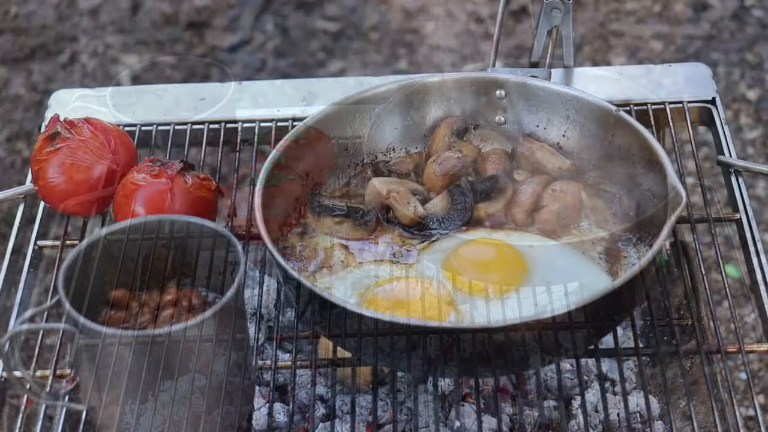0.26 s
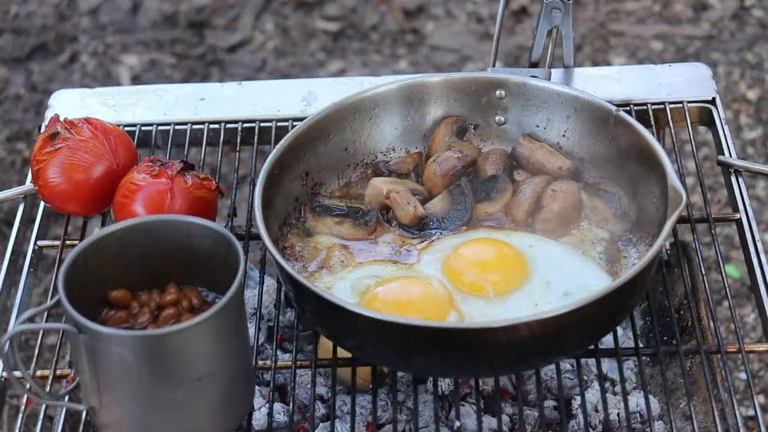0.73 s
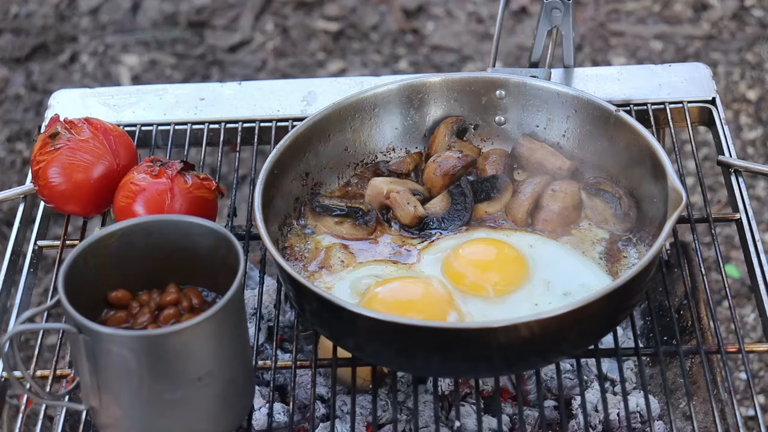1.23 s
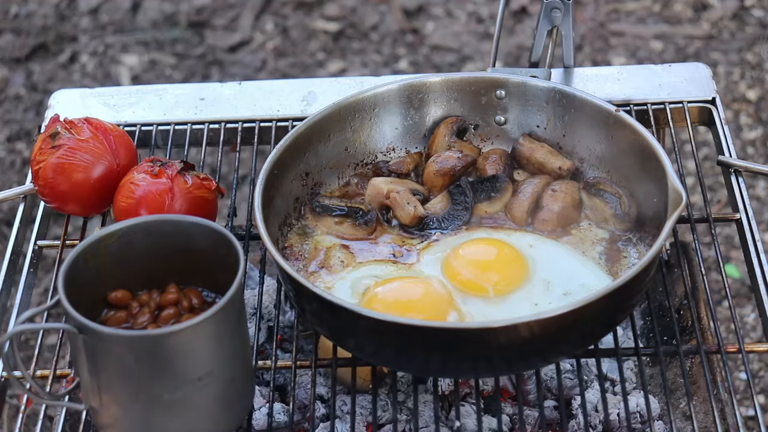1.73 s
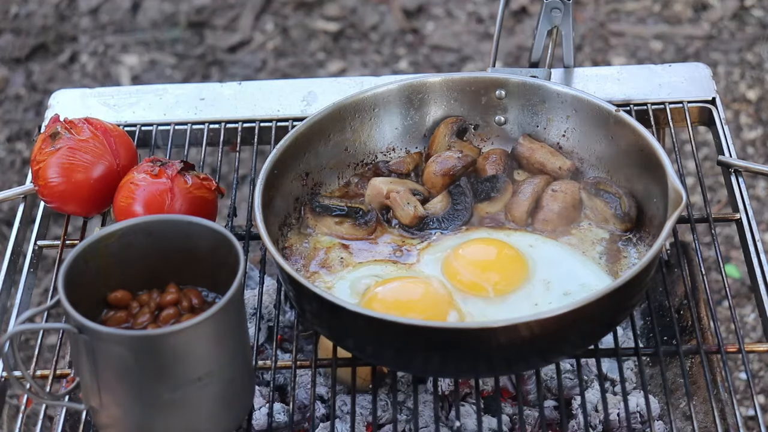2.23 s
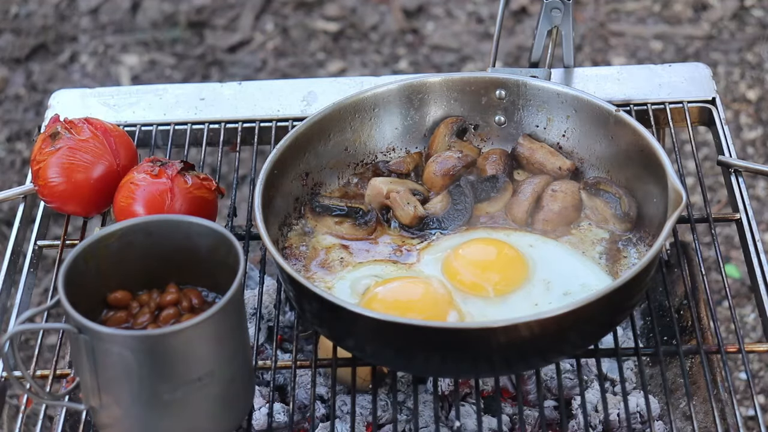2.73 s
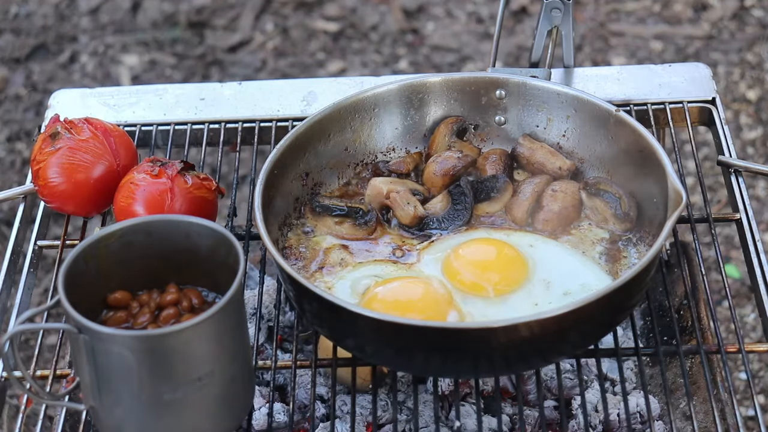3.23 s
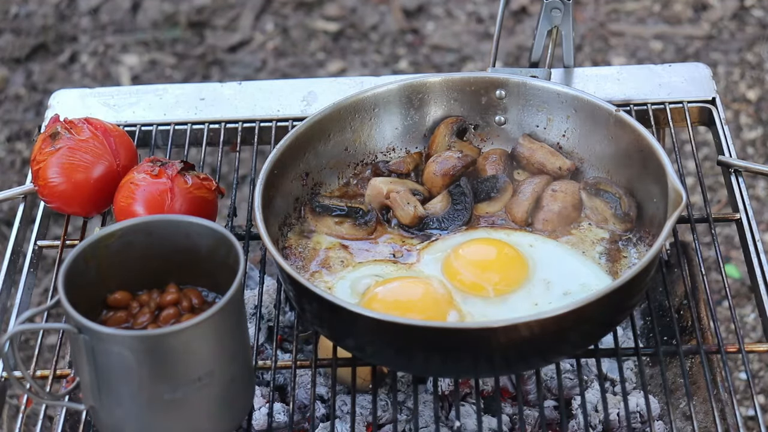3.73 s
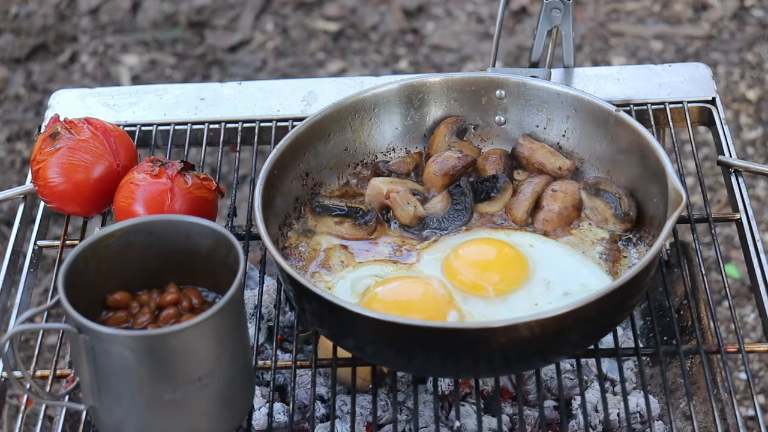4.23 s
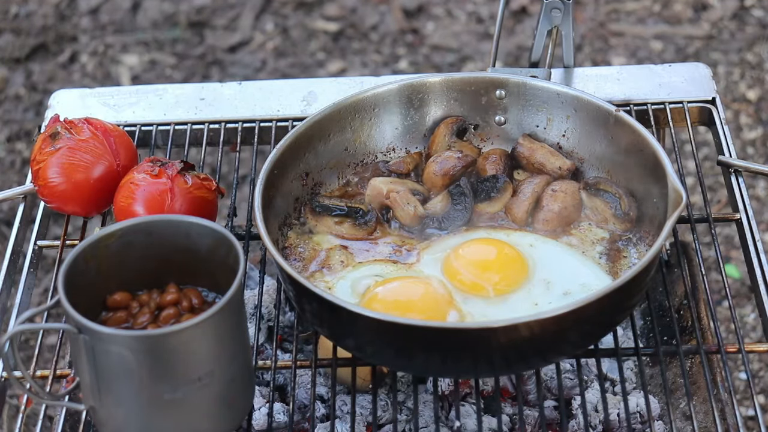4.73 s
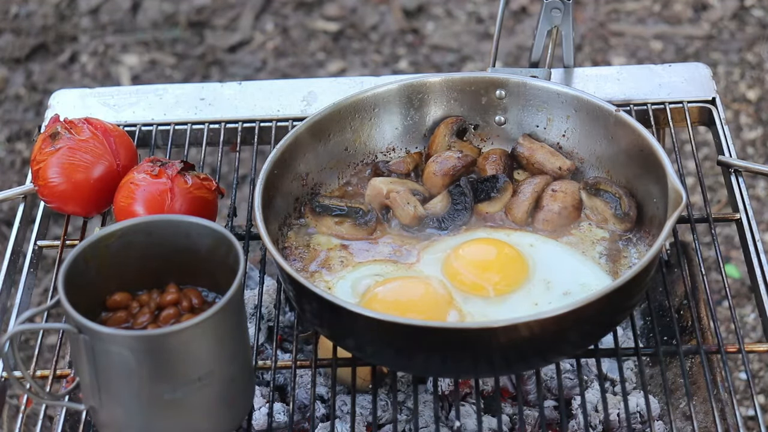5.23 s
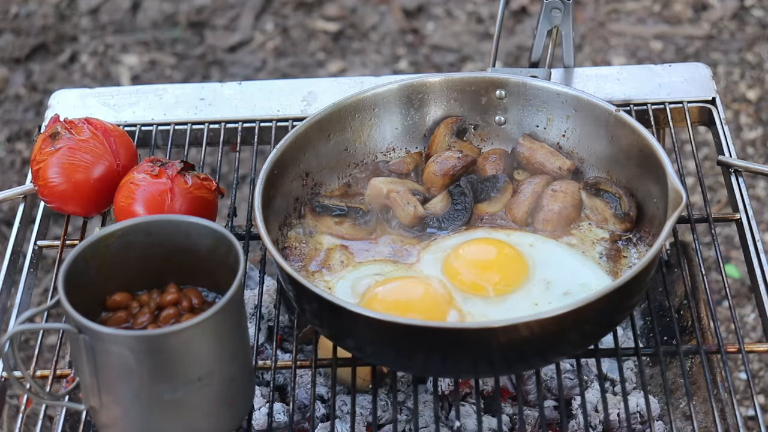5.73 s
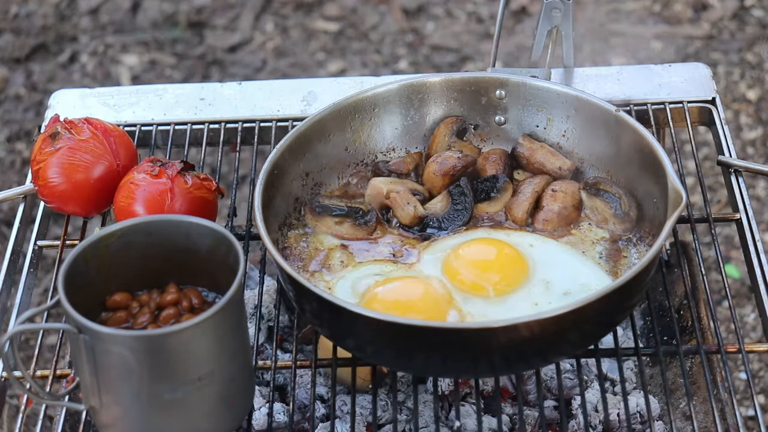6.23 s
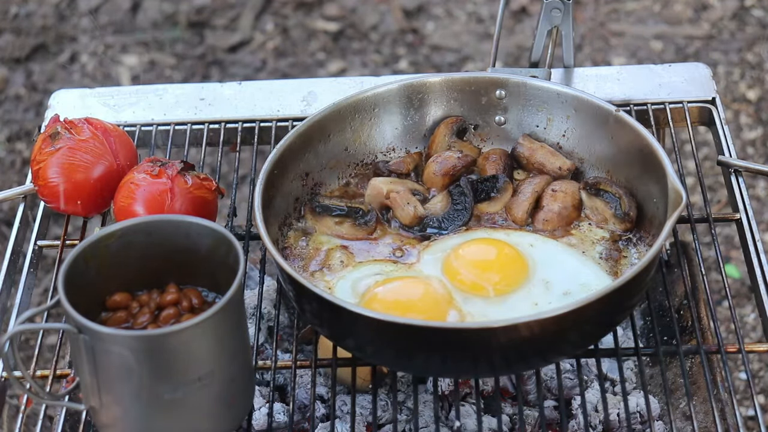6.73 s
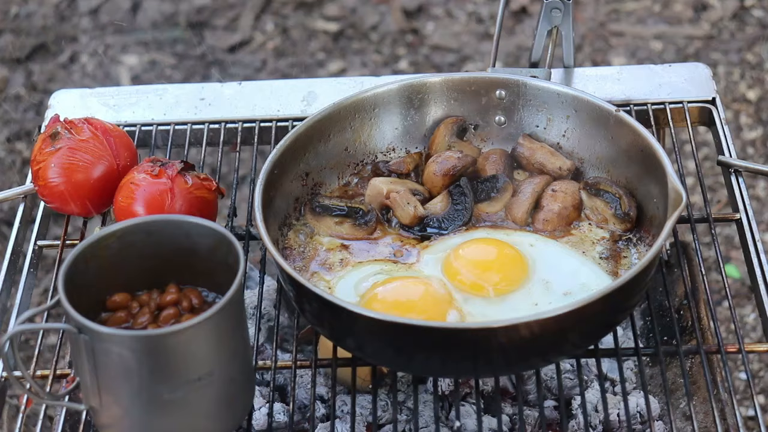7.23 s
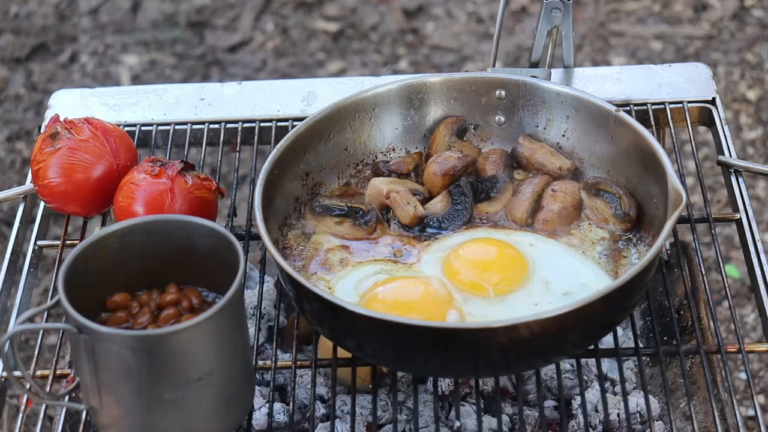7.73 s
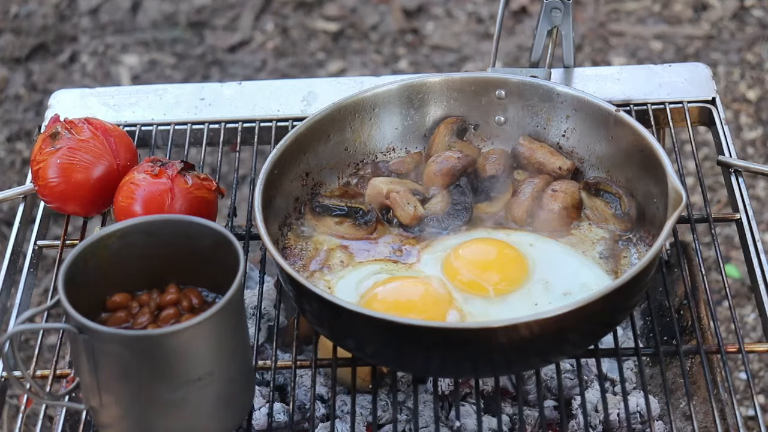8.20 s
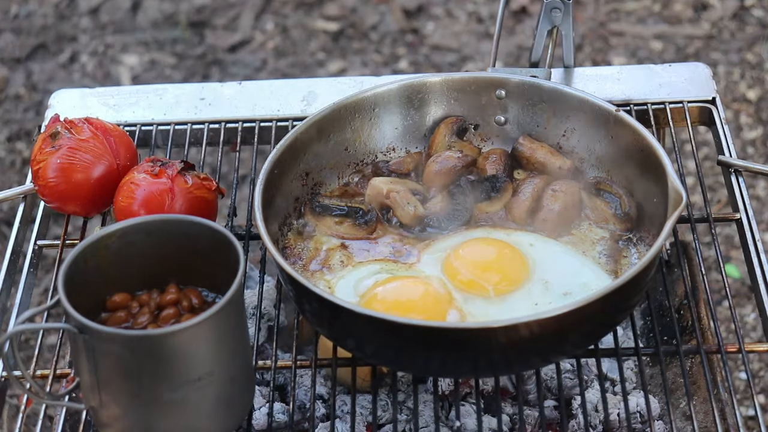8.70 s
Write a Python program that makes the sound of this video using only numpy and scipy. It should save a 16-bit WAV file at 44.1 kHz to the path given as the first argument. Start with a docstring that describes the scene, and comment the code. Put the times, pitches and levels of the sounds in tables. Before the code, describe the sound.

Very close, dry outdoor sound of food frying in a steel pan. A steady fine fizz with dense tiny crackles runs throughout. Sparse sharp pops ring briefly in the pan; a short flare of sizzling comes early, one very loud pop midway, then pops grow frequent and end in a cluster of hard spits. Faint dull thumps and low rumble lie beneath.

```python
"""Outdoors, over charcoal, eggs and mushrooms fry in a steel pan, heard close up.
Water boiling under the fat fizzes (noise grains in flickering bands) and crackles (random clicks through resonances).
Bigger pockets burst as sharp pops: decaying sines that ring the bowl of the pan, with splashes and two short echoes.
Steam squirts as buzzing puffs through a resonance. Dull thumps are a swing or two of a low tone, jolts ring
the microphone mount, and wind is a faint low band of noise."""
import sys
import numpy as np
from scipy import signal
from scipy.io import wavfile

SR = 44100
rng = np.random.default_rng(int(sys.argv[2]) if len(sys.argv) > 2 else 0)


def waveform_to_disk(signal):
    """Save audio, clipped to [-1, 1], as 16-bit WAV at the path in sys.argv[1]."""
    frames = np.transpose(np.atleast_2d(signal))
    scaled = np.clip(frames, -1, 1) * 32767
    samples = np.round(scaled).astype(np.int16)
    wavfile.write(sys.argv[1], SR, samples)


N = 395136


def from_db(db):
    """Decibels to gain."""
    return 10 ** (np.asarray(db) / 20)


def rms_one(x):
    """Scale to unit rms."""
    return x / np.sqrt(np.mean(x ** 2) + 1e-20)


def in_time(rows):
    """Each column after the first as a curve over all samples; the first holds the seconds."""
    seconds, *columns = np.transpose(rows)
    return [np.interp(np.arange(N) / SR, seconds, column) for column in columns]


def drift(rate):
    """Slow random wander with about this many turns a second and unit spread, made at every 40th sample."""
    r = np.exp(-80 * np.pi * rate / SR)
    noise = rng.standard_normal(N // 40 + 2002)
    slow = signal.lfilter([1], [1, -2 * r, r * r], noise)[2000:]   # skip the filter's start
    return np.interp(np.arange(N) / 40, np.arange(len(slow)), rms_one(slow))


def band(x, low_hz, high_hz):
    """Band-pass."""
    sos = signal.butter(2, [low_hz, min(high_hz, 19000)], "band", fs=SR, output="sos")
    return signal.sosfilt(sos, x)


def spikes(times, gains):
    """A click of each gain at each time in seconds."""
    return np.bincount(np.round(np.asarray(times) * SR).astype(int), gains, N)[:N]


def grains(per_s, spread_db, most):
    """Clicks at random moments; few are large."""
    happens = rng.random(N) < per_s / SR
    return happens * from_db(spread_db * np.minimum(rng.exponential(1, N), most))


def ring(clicks, hz, width_hz):
    """A unit click sets a sine of height 1 ringing; the wider the resonance, the sooner it dies."""
    r, w = np.exp(-np.pi * width_hz / SR), 2 * np.pi * hz / SR
    return signal.lfilter([0, np.sin(w)], [1, -2 * r * np.cos(w), r * r], clicks + 1e-18)


def splash(clicks, low_hz, high_hz, t60):
    """Droplets rain back after a burst: band-passed noise whose envelope falls 60 dB in t60 seconds."""
    envelope = signal.lfilter([1], [1, -from_db(-60 / (t60 * SR))], clicks)
    return band(envelope * rng.standard_normal(N), low_hz, high_hz)


def thud(clicks, hz):
    """One or two dull swings of a heavily damped resonance."""
    return band(ring(clicks, hz, .5 * hz), 0.23 * hz, 3.4 * hz)


def bubble(hz, cycles):
    """A collapsing pocket swells for about a cycle, then rings at its pitch, falling 60 dB in these cycles."""
    turns = np.arange(300) / SR * hz
    return -np.sin(2 * np.pi * turns) * from_db(-60 * turns / cycles) * np.tanh(turns / 1.2)


# Spectrum of the fizz. Each row: frequency in Hz, relative density in dB per Hz.
FIZZ_SPECTRUM = [(53, -16), (90, -5), (286, -6.5), (600, -5.5), (908, 3.5), (1260, -1.5), (2530, -4),
                 (3360, -3), (4870, -10.5), (6050, -18), (15100, -21.5)]


def fizz(level_db, patchy_db):
    """Thousands of tiny bubbles a second, in third-octave bands that flicker partly together."""
    hz, db = np.transpose(FIZZ_SPECTRUM)
    edges = 70 * 2 ** np.arange(0, 8.1, 1 / 3)
    together, out = drift(20), 0
    swarms = [grains(8000, spread_db=3.0, most=4) * rng.standard_normal(N) for _ in range(2)]
    for k, (low, high) in enumerate(zip(edges, edges[1:])):
        gain_db = np.interp(np.log(low * high) / 2, np.log(hz), db)
        flicker_db = patchy_db * (0.6 * together + drift(9))
        out = out + from_db(gain_db + flicker_db) * band(swarms[k % 2], low, high)   # swarms alternate
    return from_db(level_db) * out / np.std(band(out, 600, 5500))   # level set on the middle range


# Large bursting pockets. Each row: start in seconds, then levels in dB before the mix gains of the low ring,
# mid ring and bright crack, own pitch in Hz.
POP_BURSTS = [(0.398, -21.5, -15.5, -52, 2850), (0.4247, -14, -13.5, -22, 3630),
              (1.0343, -15.5, -26.5, -26.5, 3600), (1.2664, -10, -14, -22, 2920),
              (1.426, -15, -20, -46, 2860), (1.4896, -20, -24, -48, 2280), (2.0195, -17, -19.5, -27, 2870),
              (2.44, -17, -16.5, -49, 2520), (3.4469, -21.5, -18.5, -31.5, 3400),
              (3.7321, -22, -23, -30, 3150), (3.8086, -19.5, -19.5, -29.5, 3460),
              (4.4806, -9.5, -10.5, -31, 3400), (4.5608, -.5, 3, -10, 2670),
              (4.7427, -19, -18.5, -37, 3100), (4.9322, -22, -25.5, -32.5, 2230),
              (5.4591, -7, -10.5, -18, 3520), (5.8238, -18.5, -27, -34, 3270),
              (5.8922, -16.5, -24, -35, 2150), (5.9306, -13.5, -20, -33, 2650),
              (6.027, -17.5, -21.5, -31, 2900), (6.6051, -6.5, -9, -21.5, 3640),
              (6.701, -15.5, -19, -30, 2260), (6.862, -18.5, -14.5, -47, 3240),
              (6.9842, -15.5, -15, -34, 2600), (7.0254, -5.5, -11.5, -20, 2360),
              (7.1679, -13, -18, -28, 3660), (7.297, -11, -9.5, -21.5, 3500),
              (7.4565, -11, -14.5, -24.5, 3540), (7.674, -11, -22.5, -25, 2300),
              (7.7683, -15, -26, -31, 2410), (7.7801, -4, -13, -22, 3380), (7.858, -6, -10, -26, 3500),
              (8.044, -14, -28, -49, 2570), (8.2076, -5, -14, -21, 3650), (8.3207, -14, -15.5, -32, 3480),
              (8.454, -17, -24, -27, 2530), (8.4675, -5, -4.5, -14.5, 4070), (8.501, 1, -2.5, -19, 3270),
              (8.551, -15, -13.5, -17, 2940), (8.5645, -9, -11.5, -24, 3870), (8.6266, 0.5, 3, -5, 3650),
              (8.6877, -9.5, -18.5, -25, 3860), (8.8307, -8.5, -20, -37, 2960)]


def pops():
    """Large pockets ring at their own pitch, excite the bowl, splash and push the pan bottom."""
    s, low_db, mid_db, bright_db, own_hz = np.transpose(POP_BURSTS)
    low, mid, bright = (spikes(s, from_db(db)) for db in (low_db, mid_db, bright_db))
    own = np.zeros(N)
    for at, db, hz in zip(np.round(s * SR).astype(int), mid_db, own_hz):
        own[at:at + 300] += from_db(db) * bubble(hz, cycles=15.0)
    wet = from_db(-28) * splash(low, 330, 1500, t60=0.01)
    wet += from_db(-2.0) * splash(mid, 1890, 4270, t60=0.017)
    wet += from_db(-17.5) * splash(bright, 6600, 13400, t60=0.06)
    # the pan bottom gives a low push, only so far
    push = from_db(-25.5) * thud(np.minimum(low, from_db(-8.5)), 190)
    pan = bowl(low, from_db(-2.0) * mid, from_db(1.5) * bright, scatter_db=-2.5)
    return own + wet + push + pan


# Resonances of the air in the bowl of the pan, two low and three mid.
# Each row: frequency in Hz, width in Hz, relative level in dB.
BOWL_MODES = [(727, 470, -3.5), (1188, 179, -7.5), (2220, 314, -10), (3487, 660, -3), (4810, 230, -12.5)]


def bowl(low, mid, bright, scatter_db):
    """Bursts pull the air in the bowl inward, each mode with a strength of its own; above them a dry crack."""
    def uneven(clicks, db):
        """Give every click a random strength."""
        return clicks * from_db(db + scatter_db * np.clip(rng.standard_normal(N), -2, 1))

    low_ring = sum(ring(uneven(low, db), hz, width_hz) for hz, width_hz, db in BOWL_MODES[:2])
    mid_ring = sum(ring(uneven(mid, db), hz, width_hz) for hz, width_hz, db in BOWL_MODES[2:])
    crack = splash(uneven(bright, -0.67), 6000, 9360, t60=0.0044)
    crack += splash(uneven(bright, 0), 9400, 14600, t60=0.0077)
    # an open pan radiates little bass; minus is the inward pull
    return crack - band(low_ring, 567, 3000) - band(mid_ring, 1460, 4800)


def crackle(per_s, level_db):
    """Small bursts at random; each favours a few resonances, so most are narrow ticks."""
    wavering_per_s = per_s * from_db(3.0 * drift(6))
    size = from_db(level_db) * grains(wavering_per_s, spread_db=5.0, most=3.3)
    tilt_db = 6.0 * np.clip(rng.standard_normal(N), -1.6, 1.6)   # dark to bright, per click
    return bowl(size * from_db(-tilt_db - 7), size, size * from_db(tilt_db - 19), scatter_db=5.5)


# Small dry ticks, each near one pitch. Each row: start in seconds, level in dB before the mix gains, pitch in Hz.
TICK_POCKETS = [(0.0566, -33.5, 920), (0.1712, -33, 1170), (0.1858, -29, 3560), (.458, -25, 3500),
                (0.482, -23.5, 3530), (0.8845, -27.5, 3960), (1.5351, -26, 2500), (1.539, -25, 3250),
                (1.5945, -31, 2980), (1.6245, -27.5, 3200), (1.634, -26.5, 4000), (1.7695, -29.5, 4300),
                (2.1715, -31, 4800), (2.195, -26.5, 4700), (2.235, -28.5, 13350), (2.4863, -27, 4340),
                (2.6497, -25, 3670), (2.796, -26, 10600), (2.8322, -23, 3920), (2.88, -27, 790),
                (3.1168, -21, 3560), (3.278, -24, 3520), (3.3338, -28, 3290), (3.3947, -24, 3230),
                (3.4516, -21, 2720), (3.579, -28, 3570), (3.8862, -26.5, 3620), (3.8967, -29, 4950),
                (4.1439, -21, 2880), (4.2311, -21, 3460), (4.4082, -29.5, 2280), (4.448, -23, 3570),
                (4.4968, -26, 12270), (4.8007, -23, 2500), (4.8542, -27, 7750), (5.8343, -28.5, 1190),
                (5.87, -29, 3500), (5.9915, -29, 3650), (6.0511, -24.5, 5000), (6.1554, -26, 12880),
                (6.3515, -25, 3540), (6.633, -22.5, 13220), (6.7652, -28.5, 3530), (6.8011, -25, 3960),
                (6.8807, -26, 4600), (6.925, -27, 1300), (7.2254, -21, 2980), (7.5893, -22.5, 3860),
                (7.7344, -26, 1190), (7.742, -22, 3900), (7.7523, -24.5, 8000), (7.8113, -26, 3960),
                (7.8443, -23.5, 7700), (7.8532, -19, 4020), (7.8858, -25.5, 1190), (7.9966, -27, 1210),
                (8.156, -35, 1260), (8.2538, -20.5, 11200), (8.3385, -23.5, 12580), (8.4345, -28, 3600),
                (8.5257, -17.5, 3620), (8.6208, -19, 3770)]


def ticks():
    """A few cycles at the pitch of each tiny pocket, a broad dry snap, and an uneven ring of the bowl."""
    s, db, hz = np.transpose(TICK_POCKETS)
    clicks = spikes(s, from_db(db))
    out = from_db(-7) * splash(clicks, 750, 5500, t60=0.017)
    low = spikes(s, from_db(db) * 900 / hz)   # big low pockets move more air
    out += bowl(low, from_db(-8) * clicks, from_db(-14) * clicks, scatter_db=3.0)
    for at, gain, pitch_hz in zip(np.round(s * SR).astype(int), from_db(db), hz):
        out[at:at + 300] += 2 * gain * bubble(pitch_hz, cycles=16.0)
    return out


# Steam forced out from under the food. Each row: start in seconds, length in seconds, rms level in dB before
# the fade in and out, centre in Hz, width in Hz, average buzz rate in Hz.
STEAM_SQUIRTS = [(1.946, .04, -37.5, 1500, 1200, 900), (3.898, 0.02, -22.5, 1640, 380, 402.4),
                 (3.909, 0.032, -33.5, 1350, 450, 390.5), (4.333, 0.026, -30.5, 1105, 150, 368),
                 (4.36, 0.026, -39.5, 1280, 1500, 505), (8.572, 0.0046, -22, 2550, 1200, 1263)]
# The gap that the steam escapes through also sings higher. Each row: multiple of the centre, level in dB.
GAP_OVERTONES = [(1, 0), (1.75, -5), (2.6, -6), (3.6, -9)]


def squirts():
    """The edge of the food flaps as steam escapes: uneven puffs through a resonance and its overtones."""
    out = np.zeros(N)
    for s, length, db, hz, width_hz, buzz_hz in STEAM_SQUIRTS:
        at, size = round(s * SR), round(length * SR)
        timing, strength, hiss = rng.standard_normal((3, 4000))
        # uneven steps, about 1.45 on average, add up to the turns of the buzz
        turns = np.cumsum(buzz_hz / SR * np.abs(1 + 1.5 * timing) / 1.45)
        flaps = np.diff(np.floor(turns), prepend=0)
        puffs = band(flaps * from_db(2.5 * strength) + .04 * hiss, 200, 3800)
        song = sum(from_db(over_db) * ring(puffs, hz * times, width_hz * times)
                   for times, over_db in GAP_OVERTONES)
        jet = band(song + 0.5 * puffs, 0.34 * hz, 5000)[-size:]
        out[at:at + size] += from_db(db) * rms_one(jet) * np.hanning(size) ** .5
    return out


FLARE_S, FLARE_FADE_S = 1.417, .085   # start and fade time constant, seconds
FLARE_PER_S, FLARE_DB = 1200, 8   # extra crackles per second and fizz lift in dB at its start


def flare():
    """One flare-up of crackles and fizz: nothing before it, then a share fading from 1."""
    since = np.arange(N) / SR - FLARE_S
    return (since > 0) * np.exp(-np.abs(since) / FLARE_FADE_S)


# Dull thumps through the stand. Each row: start in seconds, level in dB before the thud filter, pitch in Hz.
STAND_THUMPS = [(1.469, -21.5, 253), (1.505, -35, 251), (1.823, -29, 364), (1.886, -25, 420),
                (1.947, -28, 504), (2.769, -32.5, 203), (3.645, -33.5, 156), (7.113, -31, 171),
                (7.867, -18, 183), (8.471, -24.5, 178)]


def thumps():
    """Each thump is one or two swings at its pitch."""
    return sum(thud(spikes([s], [from_db(db)]), hz) for s, db, hz in STAND_THUMPS)


# Jolts that set the microphone swaying on its mount.
# Each row: start in seconds, click level in dB before the filters.
MOUNT_JOLTS = [(1.49, -37.5), (2.243, -40), (2.499, -41), (2.894, -35.5), (3.66, -41), (7.053, -35),
               (7.142, -37.5), (7.8, -29.5), (7.891, -32), (8.482, -30), (8.569, -39)]
# Wind on the microphone. Each row: time in seconds, level in dB.
WIND_LEVEL = [(0.0, -72), (.97, -58), (1.15, -61), (4.57, -64.5), (4.64, -46), (4.85, -57.5), (8.41, -62),
              (8.58, -46.5), (8.96, -62)]
MOUNT_HZ, MOUNT_WIDTH_HZ = 63, 12
HUM_WIDTH_HZ, HUM_DB = 1.3, -17   # the sway dies into a long faint hum


def rumble():
    """Each jolt is a rough low shove that rings the mount; slow lumps of wind lie beneath."""
    s, db = np.transpose(MOUNT_JOLTS)
    clicks = spikes(s, from_db(db))
    shove = band(clicks, 38, 160)
    tremble = from_db(-91.5) * rng.standard_normal(N)
    sway = ring(shove + tremble, MOUNT_HZ, MOUNT_WIDTH_HZ) * (1 + 1.06 * drift(23))
    hum = from_db(HUM_DB) * ring(shove, MOUNT_HZ, HUM_WIDTH_HZ)
    grumble = from_db(-8) * splash(clicks, 30, 110, t60=.8)   # the stand grumbles on
    lumps = rng.standard_normal(N) * from_db(3.0 * drift(4))
    wind = rms_one(band(band(lumps, 12, 32), 10, 34))
    return sway + hum + grumble + from_db(in_time(WIND_LEVEL)[0]) * wind


# Reflections from ground and stand. Each row: delay in seconds, level in dB.
GROUND_ECHOES = [(.0063, -18), (0.0118, -21.5)]


def add_echoes(bursts):
    """Ground and stand send the bursts back later and duller."""
    far = band(bursts, 400, 9000)
    for delay, db in GROUND_ECHOES:
        lag = round(delay * SR)
        bursts[lag:] += from_db(db) * far[:-lag]
    return bursts


def channel_difference(bed):
    """The two channels differ faintly in treble and deep bass, by a fluttering copy of the bed."""
    flutter = bed * drift(68)
    treble = band(band(flutter, 7200, 14000), 8000, 17000)
    bass = band(band(flutter, 30, 600), 10, 480)
    return from_db(-12.5) * treble + from_db(-24) * bass


# Course of the frying, before trims, flare-up and random wavering.
# Each row: time in seconds, fizz level in dB, crackles per second.
FRYING = [(0, -49.5, 250), (1.38, -45.5, 156), (3.5, -45.5, 210), (6.5, -45.5, 227), (7.7, -44, 280),
          (8.96, -44, 230)]


def scene():
    """Pan sounds with their echoes, plus what reaches the microphone through stand and air."""
    fizz_db, per_s = in_time(FRYING)
    crackles = crackle(per_s + FLARE_PER_S * flare(), fizz_db + 0.5 + 5 * flare())
    bursts = add_echoes(pops() + ticks() + crackles + squirts())
    bed = fizz(fizz_db - 1.0 + FLARE_DB * flare(), patchy_db=1.1) + thumps() + rumble()
    return bursts + bed + channel_difference(bed) * [[1], [-1]]


CUTOFF_HZ = 16800


def record(dry):
    """The loudest pops overload the input and clip; a steep low-pass cuts the top."""
    clipped = np.clip(dry, -.86, .86)
    return signal.sosfilt(signal.cheby2(20, 90, CUTOFF_HZ, fs=SR, output="sos"), clipped)


dry = scene()
out = record(dry)
waveform_to_disk(out)
```